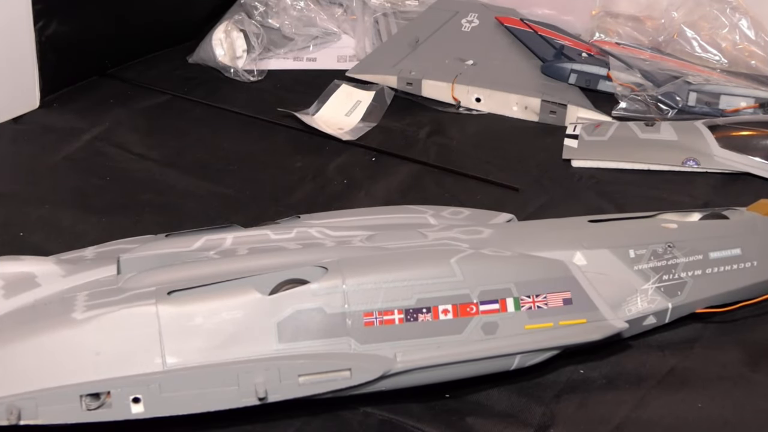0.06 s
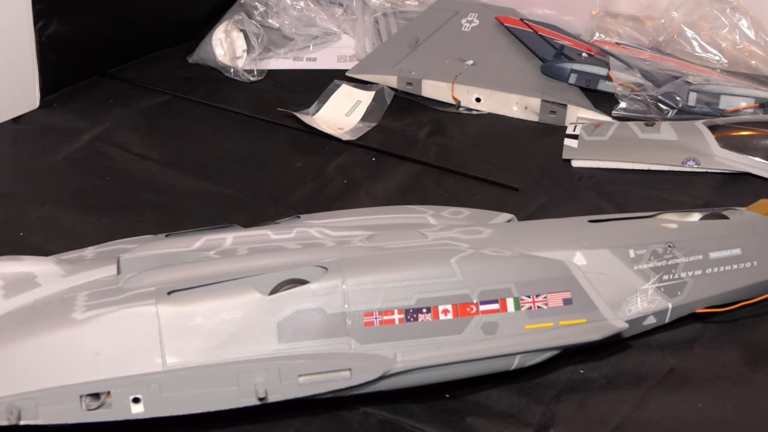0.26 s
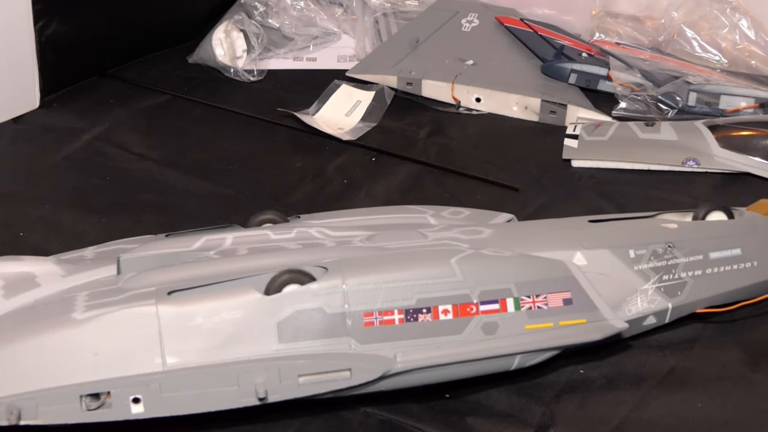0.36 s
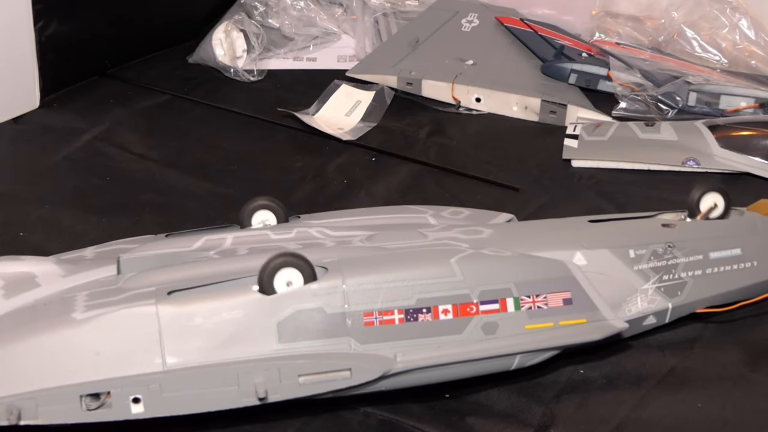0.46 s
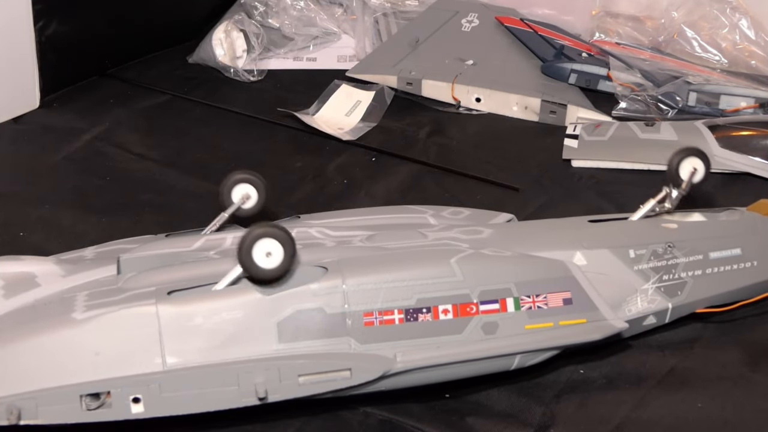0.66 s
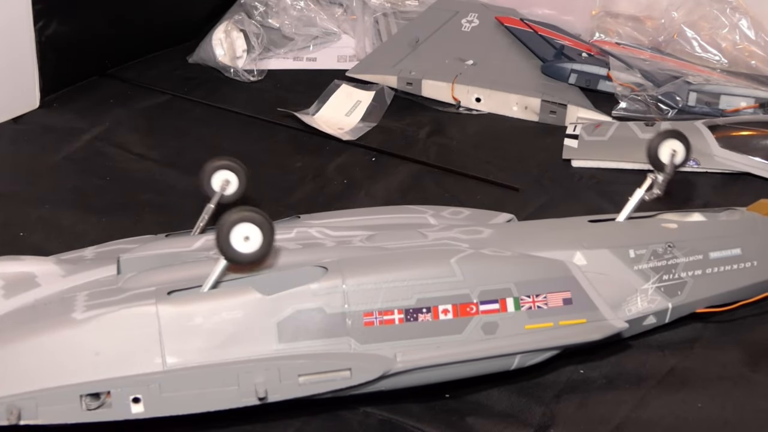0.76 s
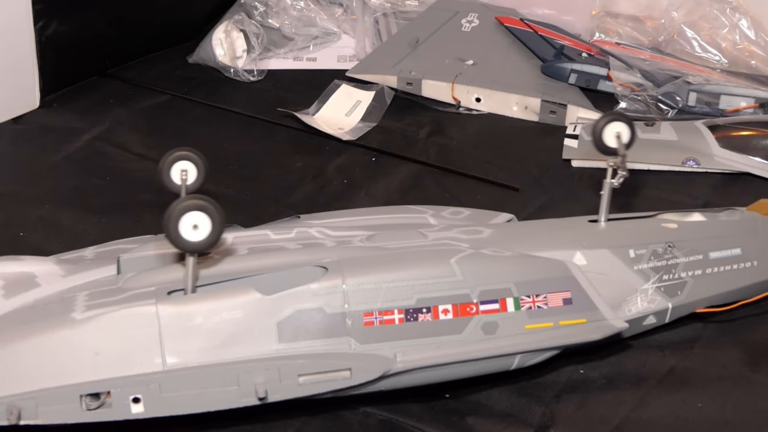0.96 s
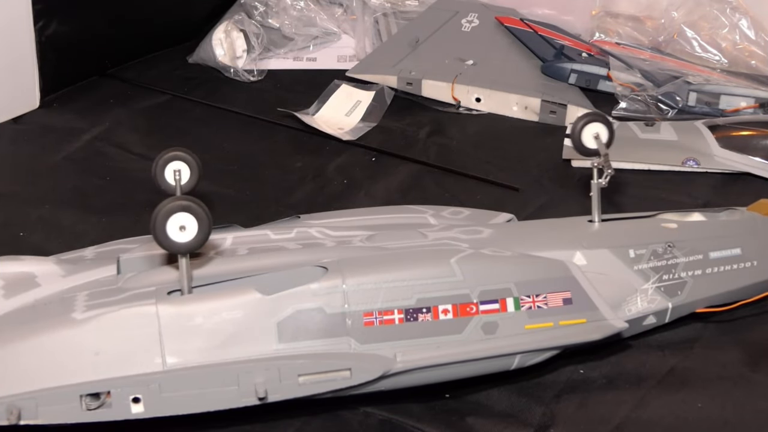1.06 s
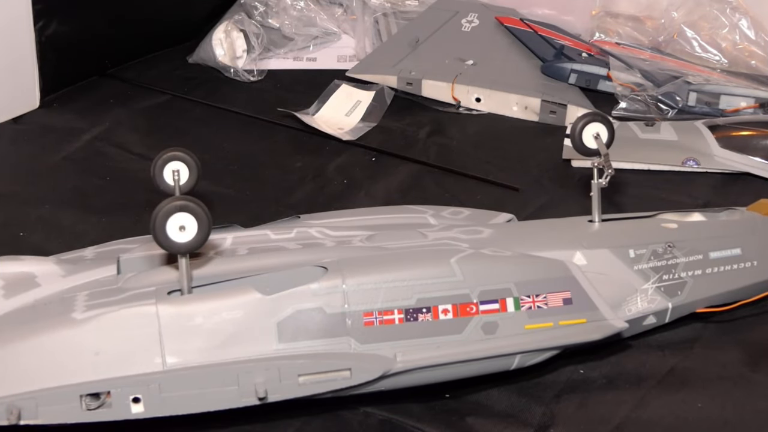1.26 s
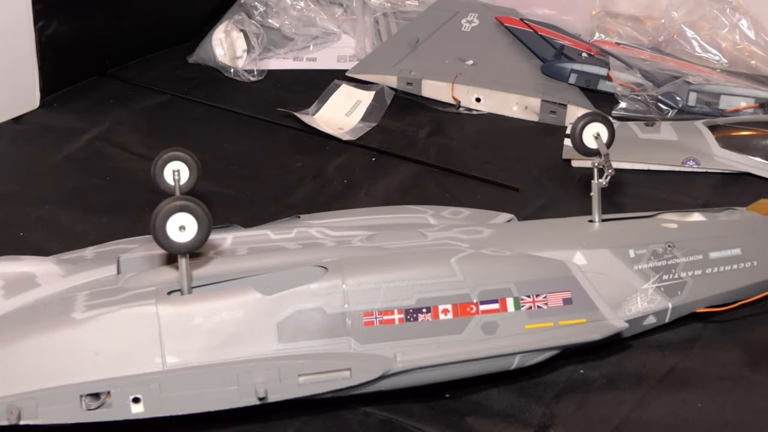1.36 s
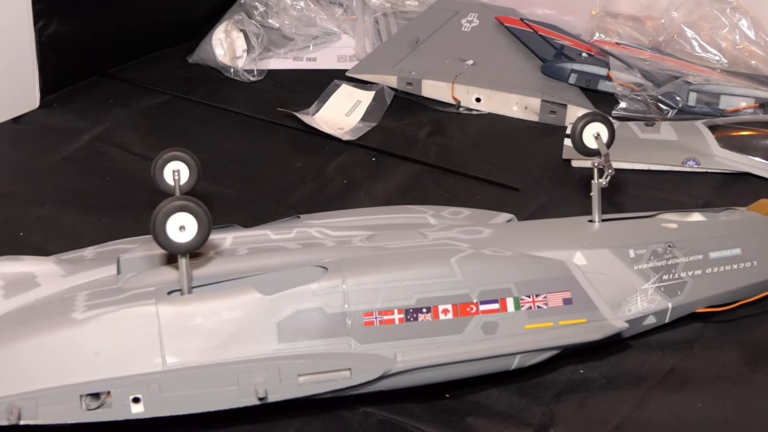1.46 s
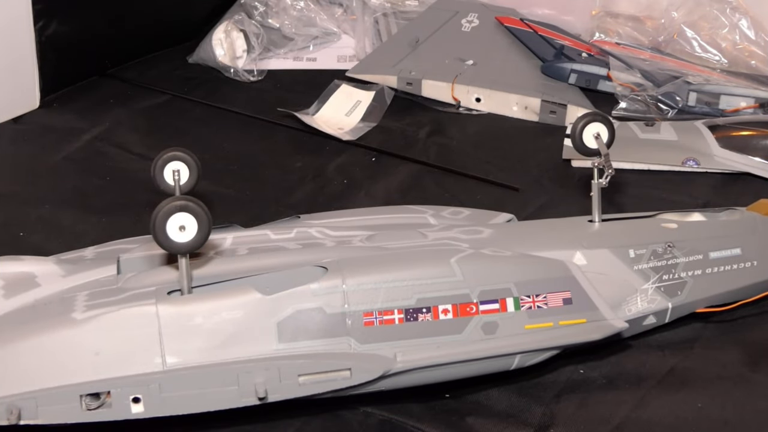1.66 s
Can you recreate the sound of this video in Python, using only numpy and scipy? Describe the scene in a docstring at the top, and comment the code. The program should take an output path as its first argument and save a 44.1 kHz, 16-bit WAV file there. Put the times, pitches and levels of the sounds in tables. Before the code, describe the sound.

Model jet landing gear motors whirr out harshly, clacking at the end in a small room

```python
"""Small room: three electric retract motors swing the landing gear of a model jet out.
Each whines at its pinion mesh, with pole and run-out tones; the three beat. The first also hums near shaft rate.
Random gear-tooth knocks rattle through resonant filters of the hollow fuselage; noise bursts are the leg clacks.
The motors slow and sing under load, then lose power and coast to rest. A brief hiss precedes the start.
Filtered noise gives the room's air and decaying noise its reverberation."""
import sys
import numpy as np
from scipy import signal
from scipy.fft import rfft, irfft, next_fast_len
from scipy.io import wavfile
from scipy.ndimage import uniform_filter1d, map_coordinates

SR = 44100
rng = np.random.default_rng(int(sys.argv[2]) if len(sys.argv) > 2 else 0)


def materialize(psi):
    """Save the field psi as 16-bit PCM at rate SR to the path in sys.argv[1].

    A 1-D psi becomes a single channel; in a 2-D psi each row is a channel.
    """
    bounded = np.clip(np.atleast_2d(psi).T, -1, 1)
    quanta = np.round(bounded * 32767).astype(np.int16)
    wavfile.write(sys.argv[1], SR, quanta)


N = 74970

# Common shaft speed before each motor's offset and coast: (time [s], speed [turns/s])
SHAFT_SPEED = [(.185, 228), (.228, 266), (.255, 286), (.355, 287.5), (.38, 273), (.41, 266.5), (.5, 267),
               (.68, 268), (.8, 265.5), (.93, 268), (1.0, 277.3), (1.09, 288.5), (1.2, 288), (1.28, 285),
               (1.32, 280)]
# Motors: (power on [s], power off [s], speed offset at full load [Hz], level [dB],
# left over right [dB], pole tone [dB])
MOTORS = [(0.183, 1.328, -0.5, -1, -2.5, -15), (0.191, 1.34, 4.5, -4.5, 2, 9),
          (0.196, 1.32, -5.5, -5, 3.5, -3)]
# Tones, relative levels: (time [s], shaft hum [dB], rotor pole tone [dB], gear whine [dB])
TONE_LEVELS = [(.2, -56, -74, -41), (.24, -43.5, -63, -34), (.262, -55, -63, -28), (.345, -56, -62, -26.5),
               (.362, -46, -45, -27.5), (.42, -43, -47.5, -22.5), (.62, -46, -47, -20.5),
               (.76, -46.5, -49.5, -25.5), (.84, -49.5, -49.5, -26.5), (.91, -47, -47.5, -24.5),
               (1.01, -56, -48.5, -27), (1.06, -50, -45, -29), (1.11, -46.5, -46, -31.5),
               (1.2, -60, -42, -30.5), (1.26, -57, -52, -31), (1.315, -48, -53, -25.5),
               (1.365, -53, -56, -29)]
# Gear rattle, relative levels: (time [s], shell [dB], low mids [dB], ringing under load [dB])
RATTLE_LEVELS = [(.19, -25.5, -29, -55), (.26, -24.5, -34, -51), (.345, -24, -33, -43.5),
                 (0.378, -22.5, -32, -24), (0.431, -25, -38, -30.5), (.6, -26, -39.5, -29),
                 (.78, -25, -39.5, -29.5), (.87, -24.5, -34.5, -30), (1.0, -25.5, -37, -32.5),
                 (1.05, -27.5, -35.5, -45), (1.12, -26, -33.5, -58.5), (1.2, -25, -33.5, -34.5),
                 (1.315, -25.5, -35, -45), (1.35, -28, -34.5, -54), (1.41, -26, -35.5, -54.5)]
# Steady gear run-out partials: (order of the shaft [cycles/turn]) and (level [dB])
RUNOUT_ORDERS = [8, 16]
RUNOUT_LEVELS_DB = [-39.5, -41.5]
# Fuselage panel modes: (frequency [Hz], level [dB], T60 [s])
PANEL_MODES = [(1205, -13, 0.11), (1333, -14, 0.2), (2260, -6.5, 0.34), (2532, -14.5, 0.12),
               (2763, -3.5, 0.044)]
# Legs meeting their stops: (time [s], level [dB])
LEG_CLACKS = [(1.005, -22), (1.29, -21), (1.318, -22), (1.401, -30.5)]
# Fuselage spectra: shell, low mids, ringing under load, rumble: (frequency [Hz], level [dB])
SHELL_SPECTRUM = [(300, -42), (1200, -24.5), (2000, -9.5), (2700, 1.5), (3400, 0), (4300, -1), (5500, -5.5),
                  (6900, -3.5), (8500, -13.5), (10300, -7.5), (11800, -17.5), (13500, -23.5),
                  (15500, -39.5)]
LOW_MID_SPECTRUM = [(25, -41), (70, -25), (120, -32.5), (180, -15), (380, -12), (540, -10), (700, -5),
                    (950, 4), (1350, 6), (1900, 1), (3000, -7), (8000, -100.5)]
LOAD_RING_SPECTRUM = [(1000, -56), (3900, -15.5), (4450, -5.5), (4750, -5), (5050, -12.5), (5600, -17),
                      (12000, -43.5)]
RUMBLE_SPECTRUM = [(25, -43), (100, -16), (170, 3), (220, -6), (330, -13), (420, 5), (560, 1.5),
                   (900, -29.5)]
# Side signal of the near reflections: (frequency [Hz], level [dB])
SIDE_SPECTRUM = [(100, 2.5), (1000, -9), (2500, -7), (4500, -17), (8000, -12.5), (13000, -2)]
# Room decay: (frequency [Hz], T60 [s])
ROOM_T60 = [(200, 0.61), (1000, 0.33), (3500, 0.27), (7000, 0.18), (14000, 0.24)]
# Air of the room: (frequency [Hz], level [dB])
AIR_SPECTRUM = [(25, -28), (120, -20.5), (200, -12), (270, -11), (370, -7), (460, -15.5), (590, -6),
                (870, -9), (1300, -12), (1650, -14), (2000, -19), (4600, -23.5), (8500, -32),
                (15000, -28.5)]
# Hiss before the start: (time [s], level [dB])
HISS_LEVEL = [(.04, -100), (.09, -65), (.13, -73.5), (.18, -74.5), (.25, -100)]

SPIN_UP_S, COAST_S, UNLOAD_S = 0.031, 0.295, 0.026
COAST_FADE_POWER, COAST_WHINE_DB = 1.616, -13.5  # fade = speed fraction ** power
FREE_HZ, DROOP_HZ, MIN_LOAD = 288.87, 20, 0.25  # load = speed lost / droop
WANDER_HZ, FLUTTER_HZ = 1.2, 1.6  # slow (scaled by load) and quick shaft unsteadiness
TEETH, POLES = 9, 3  # cycles per turn
TOOTH_SCATTER_DB, TOOTH_PATTERN_DB, CHATTER_DB = 3, 2, 1.5
TOOTH_JITTER_S, RUB_DB = 0.00007, -4
ROUGH_DB, ROUGH_KNOTS_PER_S = 2.5, 151.4
BURST_DB, BURST_KNOTS_PER_S = 1.5, 90.2
POLE_WAVER_DB, HUM_WAVER_DB, RUMBLE_DB = 1, 3.6, -15.5
PANEL_LOW_HZ, CLACK_T60_S = 874, 0.048
GEAR_DB, GEAR_ROOM_DB, HUM_ROOM_DB = -3.5, -8, -7
ROOM_SIDE_DB, AIR_DB, AIR_SIDE_DB = -7.5, -61.5, -2.5
TOP_HZ = 15600


def amp(db):
    """Decibels to gain."""
    return 10 ** (np.asarray(db) / 20)


def unit(x):
    """Scale to rms 1."""
    return x / np.sqrt(np.mean(x ** 2) + 1e-20)


def along(points, hz):
    """Read (frequency [Hz], value) points on a log frequency axis."""
    f, v = np.transpose(points)
    return np.interp(np.log(hz + 1), np.log(f + 1), v)


def curves(rows):
    """One value per sample for each column after the time."""
    s, *cols = np.transpose(rows)
    return [np.interp(np.arange(N) / SR, s, c) for c in cols]


def wobble(knots_per_s):
    """Smooth random curve through Gaussian knots."""
    knots = rng.standard_normal(N // 16)
    return map_coordinates(knots, [np.arange(N) * knots_per_s / SR], mode="wrap")


def filtered(x, response):
    """Multiply the spectrum of x by a real response of frequency."""
    m = next_fast_len(N + SR // 2)
    return irfft(rfft(x, m) * response(np.fft.rfftfreq(m, 1 / SR)), m)[..., :N]


def ring(x, spectrum, size=4096):
    """Causal minimum-phase body with this spectrum; keeps the power of white input."""
    cep = irfft(np.log(amp(along(spectrum, np.fft.rfftfreq(size, 1 / SR)))))
    cep[1:size // 2] *= 2  # fold the cepstrum onto positive time
    cep[size // 2 + 1:] = 0
    h = irfft(np.exp(rfft(cep)))
    return signal.fftconvolve(x, h / np.linalg.norm(h))[:N]


def motor(start_s, stop_s, offset_hz, own_pole_db, bursts):
    """Geared motor: shaft phase drives hum, pole tone, whine and rattle; returns (hum, gears)."""
    t = np.arange(N) / SR
    off_s = np.maximum(t - stop_s, 0)
    coast = np.clip(1 - off_s / COAST_S, 0, 1)
    running = np.clip((t - start_s) / SPIN_UP_S, 0, 1) * coast ** COAST_FADE_POWER
    shaft_hz, = curves(SHAFT_SPEED)
    # load pulls the motors apart in speed
    load = np.clip((FREE_HZ - shaft_hz) / DROOP_HZ, MIN_LOAD, 1)
    loaded_hz = shaft_hz + load * (offset_hz + WANDER_HZ * wobble(12))
    speed_hz = coast * (loaded_hz + FLUTTER_HZ * wobble(140))
    turns = np.cumsum(speed_hz) / SR

    def tone(order):
        """Sine of rms 1 at a multiple of shaft speed."""
        return np.sqrt(2) * np.sin(2 * np.pi * (order * turns + rng.random()))

    def rough_tone(order):
        """Tone with random level roughness, rms 1."""
        return unit(tone(order) * amp(ROUGH_DB * np.minimum(wobble(ROUGH_KNOTS_PER_S), 1)))

    hum_db, pole_db, whine_db = curves(TONE_LEVELS)
    shell_db, low_db, ring_db = curves(RATTLE_LEVELS)
    whine = amp(whine_db) * bursts * rough_tone(TEETH)
    whine_octave = amp(ring_db) * tone(2 * TEETH)
    runout = sum(amp(db) * tone(k) for k, db in zip(RUNOUT_ORDERS, RUNOUT_LEVELS_DB))
    poles = amp(pole_db + own_pole_db + POLE_WAVER_DB * wobble(45)) * rough_tone(POLES)

    # knocks soften and dull as the rotor slows
    knocks = teeth(turns)
    dull = 1 - coast ** 2
    knocks = (1 - dull) * knocks + dull * uniform_filter1d(knocks, size=3)
    drive = knocks * running
    rattle = ring(drive * amp(shell_db), SHELL_SPECTRUM)
    rattle += ring(drive * amp(low_db), LOW_MID_SPECTRUM)
    rattle += ring(drive * amp(ring_db), LOAD_RING_SPECTRUM)

    # teeth unload at power-off; faint tones glide down with the rotor
    residue = amp(COAST_WHINE_DB)
    meshing = residue + (1 - residue) * np.exp(-off_s / UNLOAD_S)
    hum = amp(HUM_WAVER_DB * wobble(30)) * tone(0.99)
    hum += amp(RUMBLE_DB) * ring(knocks, RUMBLE_SPECTRUM)
    hum *= running * meshing * amp(hum_db)
    tones = running * meshing * (whine + whine_octave + runout + poles)
    return hum, tones + rattle + panels(drive * meshing * amp(low_db))


def teeth(turns):
    """One knock per tooth, in an uneven pattern repeating each turn, over sliding noise; rms 1."""
    k = np.arange(N // 8)
    time_pattern, force_pattern = rng.standard_normal((2, TEETH))[:, k % TEETH]
    time_chance, force_chance = rng.standard_normal((2, len(k)))
    at = np.interp((k + time_pattern / 2) / TEETH, turns, np.arange(N), right=2 * N)
    at += TOOTH_JITTER_S * SR * time_chance
    force = amp(TOOTH_PATTERN_DB * unit(force_pattern) + TOOTH_SCATTER_DB * force_chance)
    force *= np.sign(rng.standard_normal(len(k)) + force_pattern / 2)
    ok = (at >= 0) & (at < N - 1)
    knocks = unit(np.bincount(at[ok].astype(int), force[ok], N))
    rub = amp(RUB_DB) * rng.standard_normal(N)
    return unit((knocks + rub) * amp(CHATTER_DB * wobble(300)))


def panels(x):
    """Decaying fuselage panel modes, levels for white input of rms 1; small panels radiate no bass."""
    t = np.arange(SR // 5) / SR
    modes = [amp(db) * unit(amp(-60 * t / t60) * np.cos(2 * np.pi * hz * t))
             for hz, db, t60 in PANEL_MODES]
    ringing = signal.fftconvolve(x, sum(modes) / np.sqrt(len(t)))[:N]
    return filtered(ringing, lambda hz: 1 - np.exp(-(hz / PANEL_LOW_HZ) ** 4))


def leg_clacks():
    """Legs hit their stops: decaying noise bursts shake the fuselage shell."""
    t = np.arange(N) / SR
    force = sum(amp(db - 60 * np.abs(t - s) / CLACK_T60_S) * (t >= s) for s, db in LEG_CLACKS)
    return ring(force * rng.standard_normal(N), SHELL_SPECTRUM)


def spread(x):
    """Near reflections off fuselage and table differ at the two ears: short random echo as side."""
    echo = rng.standard_normal(SR // 100)
    reflected = signal.fftconvolve(x, echo / np.linalg.norm(echo))[:N]
    side = filtered(reflected, lambda hz: amp(along(SIDE_SPECTRUM, hz)))
    return np.array([x + side, x - side])


def room(x):
    """Diffuse tail: noise with a decay time per frequency, mostly alike in both ears."""
    hz, t, z = signal.stft(rng.standard_normal((2, SR // 2)), SR, nperseg=256)
    decay = amp(-60 * t / along(ROOM_T60, hz)[:, None])
    tails = signal.istft(z * decay, SR, nperseg=256)[1]
    tails = tails / np.linalg.norm(tails[0])
    delayed = np.pad(x, (SR // 200, 0))  # 5 ms
    mid, side = signal.fftconvolve(delayed[None], tails, axes=1)[:, :N]
    side = side * amp(ROOM_SIDE_DB)
    return np.array([mid + side, mid - side])


def room_tone():
    """Faint steady air as filtered noise, plus a brief hiss before the motors start."""
    air = unit(filtered(rng.standard_normal((2, N)), lambda hz: amp(along(AIR_SPECTRUM, hz))))
    # hiss: shell spectrum at half its dB
    hiss = unit(filtered(rng.standard_normal((2, N)), lambda hz: amp(along(SHELL_SPECTRUM, hz) / 2)))
    mid, side = amp(AIR_DB) * air + amp(curves(HISS_LEVEL)[0]) * hiss
    side = side * amp(AIR_SIDE_DB)
    return np.array([mid + side, mid - side])


def scene():
    """Three motors and leg clacks in the room; only the first, nearest motor's hum is heard."""
    # shared uneven bursts of the whine
    bursts = unit(amp(BURST_DB * np.minimum(wobble(BURST_KNOTS_PER_S), 1)))
    clacks = leg_clacks()
    direct = spread(clacks)
    gears = clacks
    hums = []
    for start_s, stop_s, offset_hz, level_db, left_right_db, pole_db in MOTORS:
        hum, gear = amp(level_db) * np.array(motor(start_s, stop_s, offset_hz, pole_db, bursts))
        direct = direct + spread(gear) * amp([[left_right_db / 2], [-left_right_db / 2]])
        gears = gears + gear
        hums.append(hum)
    hum = hums[0]
    gear_sound = amp(GEAR_DB) * (direct + amp(GEAR_ROOM_DB) * room(gears))
    hum_sound = hum + amp(HUM_ROOM_DB) * room(hum)
    return gear_sound + hum_sound + room_tone()


def record(dry):
    """Band limit: nothing is kept from TOP_HZ up."""
    return filtered(dry, lambda hz: hz < TOP_HZ)


dry = scene()
out = record(dry)
materialize(out)
```